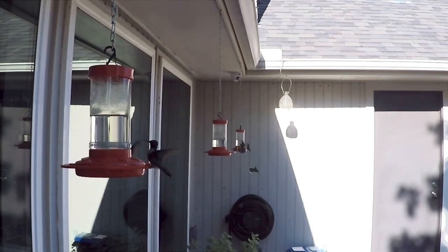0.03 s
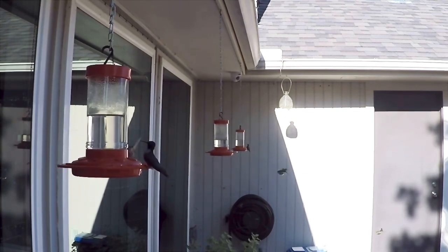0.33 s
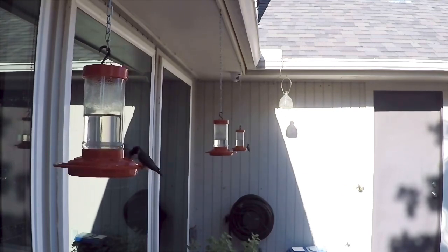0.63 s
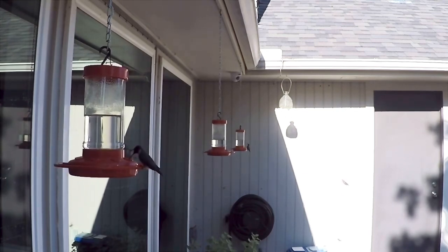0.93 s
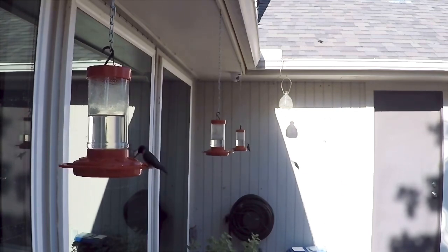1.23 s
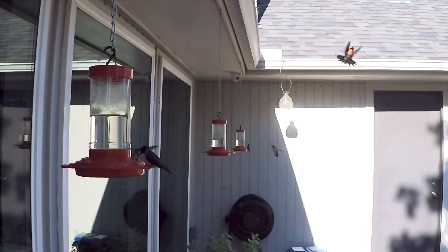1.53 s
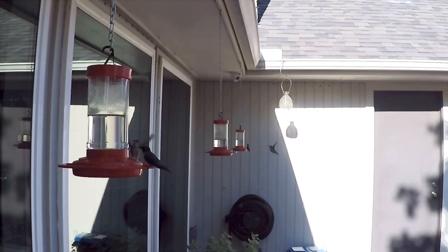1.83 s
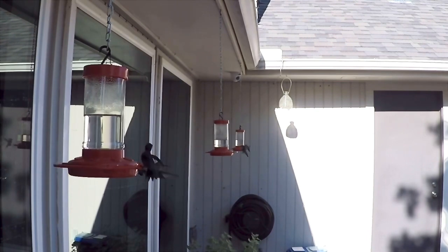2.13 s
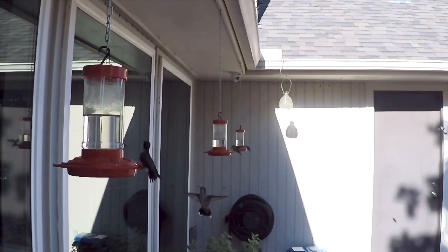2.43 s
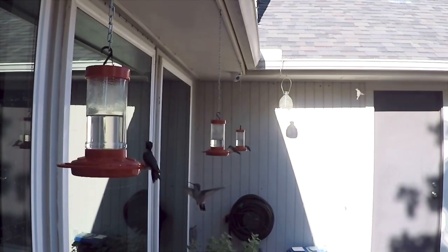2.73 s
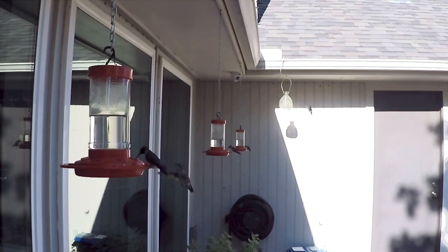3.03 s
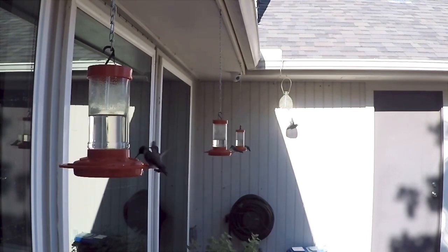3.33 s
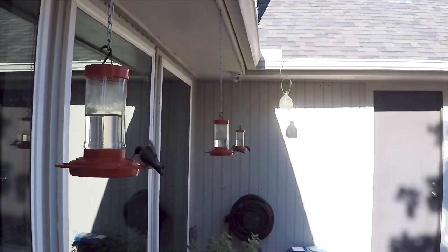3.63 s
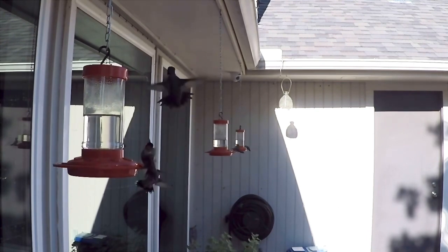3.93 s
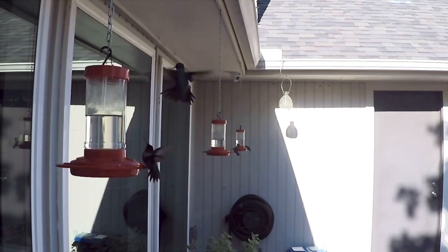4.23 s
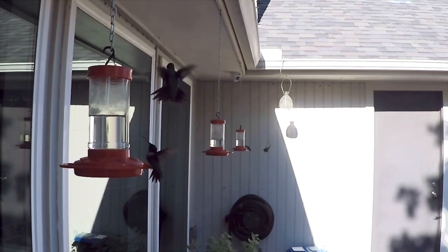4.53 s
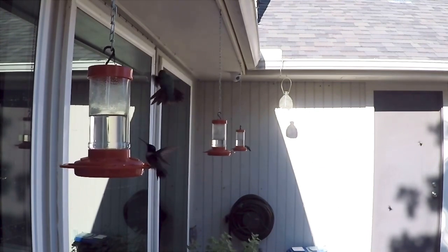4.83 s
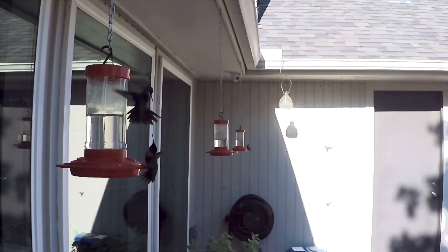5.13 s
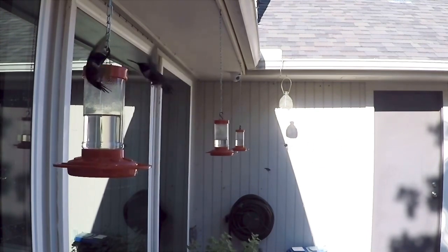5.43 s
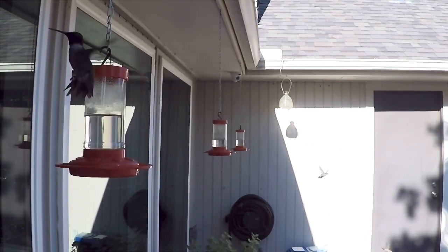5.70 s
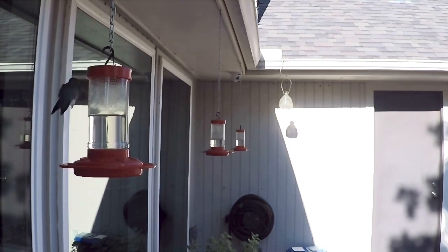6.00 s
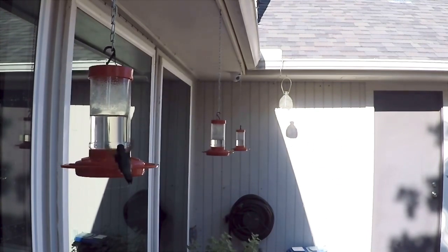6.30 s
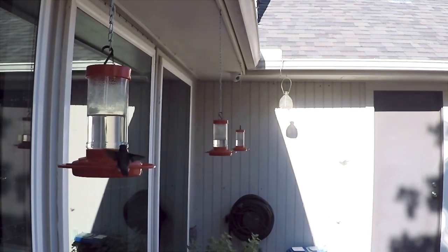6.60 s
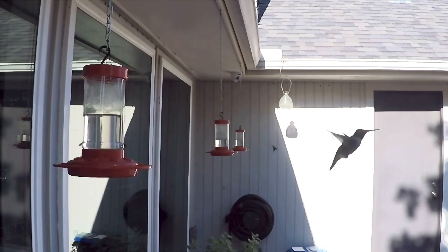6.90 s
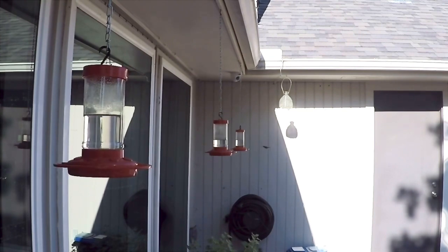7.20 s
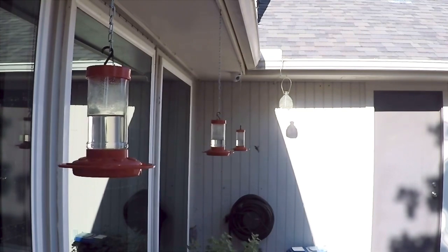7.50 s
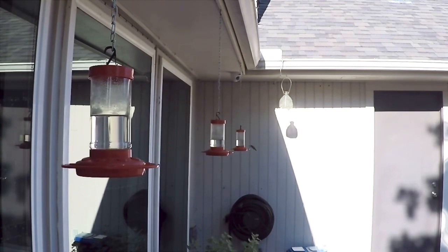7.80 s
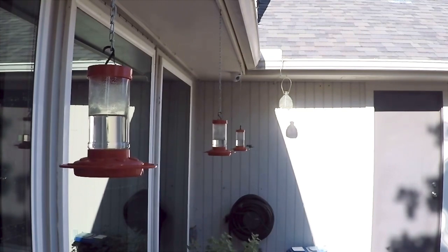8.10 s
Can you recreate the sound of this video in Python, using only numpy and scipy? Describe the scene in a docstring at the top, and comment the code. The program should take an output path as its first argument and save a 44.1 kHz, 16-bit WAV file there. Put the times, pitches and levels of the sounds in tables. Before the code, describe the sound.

Hummingbirds squabble around a feeder on a porch, trading quick runs of sharp chips, harsh rasps, buzzy trills and a few thin squeaks. Their wings hum in swells as they dart about, twice passing right by the microphone. Farther off, a larger bird repeats a nasal cry. The calls echo lightly off the house walls and thin out near the end, over a steady low outdoor rumble.

```python
"""On a porch, hummingbirds squabble round a feeder: falling chips, harsh rasps, buzzy trills and thin
squeaks. Each call is a tone of the syrinx; the throat's resonances colour all but the squeaks.
Wing strokes push the air periodically and hum, twice right past the microphone. Farther off a larger
bird repeats a nasal cry. The house walls reflect the calls, over a steady low outdoor rumble."""
import sys
import numpy as np
from scipy import signal
from scipy.fft import rfft, irfft, next_fast_len
from scipy.io import wavfile
from scipy.ndimage import map_coordinates

SR = 44100
rng = np.random.default_rng(int(sys.argv[2]) if len(sys.argv) > 2 else 0)


def store_wav(level_fs):
    """Save 16-bit WAV to argv[1]."""
    pcm = np.round(np.clip(np.atleast_2d(level_fs), -1, 1) * 32767)
    wavfile.write(sys.argv[1], SR, pcm.T.astype(np.int16))


N = 359415


def amp(db):
    """Decibels to amplitude ratio."""
    return 10 ** (np.asarray(db) / 20)


def unit(x):
    """Normalise to rms 1."""
    return x / np.sqrt(np.mean(x ** 2) + 1e-20)


def times(length_s):
    """Time axis of a note, in seconds."""
    return np.arange(int(length_s * SR)) / SR


def along(points, hz):
    """Interpolate (frequency_hz, value) points on a log frequency axis."""
    freqs, values = np.transpose(points)
    return np.interp(np.log(np.abs(hz) + 1), np.log(freqs + 1), values)


def timeline(points):
    """Interpolate (time_s, value) points over the whole scene."""
    return np.interp(np.arange(N) / SR, *np.transpose(points))


def wobble(rate, size):
    """Smooth random modulation with rate knots a second."""
    knots = rng.standard_normal(int(size * rate / SR) + 4)
    return map_coordinates(knots, [np.arange(size) * rate / SR])


def phase_of(hz):
    """Phase is the time integral of frequency."""
    return 2 * np.pi * np.cumsum(hz) / SR


def gate(t, length, rise, fall):
    """Envelope with sine-squared attack and release."""
    attack = np.sin(np.pi / 2 * np.clip(t / rise, 0, 1)) ** 2
    return attack * np.sin(np.pi / 2 * np.clip((length - t) / fall, 0, 1)) ** 2


def add(track, start_s, sound):
    """Superpose a sound on the track."""
    part = track[max(round(start_s * SR), 0):][:len(sound)]
    part += sound[:len(part)]


def filtered(x, response):
    """Linear filter: the spectrum times a frequency response."""
    size = next_fast_len(N + SR // 4)
    return irfft(rfft(x, size) * response(np.fft.rfftfreq(size, 1 / SR)), size)[..., :N]


# Left-right likeness of the outdoor noise: frequency_hz, correlation
COHERENCE = [(130, 0.99), (290, 1), (630, 0.12), (1380, -0.86), (3000, 0.45), (6600, 0.035)]
def noise_field(spectrum):
    """Partial coherence: the ratio of mid to side noise sets how alike the two channels are."""
    def response(hz):
        angle = np.arccos(np.clip(along(COHERENCE, hz), -1, 1)) / 2
        return amp(along(spectrum, hz)) * [np.cos(angle), np.sin(angle)]
    mid, side = filtered(rng.standard_normal((2, N)), response)
    return unit(np.array([mid + side, mid - side]))


# Spectra of the rumble and the hiss: frequency_hz, relative_density_db
RUMBLE_SPECTRUM = [(12, -48), (20, -21), (32, 0.5), (40, 0), (85, -1.5), (96, -0.5), (124, -3),
                   (181, -12.5), (238, -13.5), (323, -20), (464, -20), (489, -20), (536, -23.5),
                   (619, -33.5), (1500, -46.5), (1950, -50.5), (3300, -120)]
HISS_SPECTRUM = [(710, -66), (1200, -5), (1700, -11.5), (2030, -14), (2880, -15.5), (4920, -19.5),
                 (9070, -17.5), (12700, -28), (14900, -41)]
# Course of the rumble: time_s, level_db
RUMBLE_LEVEL = [(0, -21), (6, -21), (8.15, -22.5)]
def outdoors(hiss_db=-54.5, drone_hz=527, drone_db=-46, drone_start_s=4.1):
    """Ambient noise floor: low rumble and faint hiss, with a distant tone that swells and fades once."""
    swell = gate(np.arange(N) / SR - drone_start_s, length=1.789, rise=0.16, fall=0.74)
    swell *= amp(drone_db + 3 * wobble(7, N))
    drone = swell * unit(np.sin(phase_of(drone_hz + 3 * wobble(8, N))))
    rumble = amp(timeline(RUMBLE_LEVEL)) * noise_field(RUMBLE_SPECTRUM)
    return rumble + amp(hiss_db) * noise_field(HISS_SPECTRUM) + drone


# Decay of the yard at stretch 1: frequency_hz, t60_s
YARD_DECAY = [(2000, 0.53), (7000, 0.28), (13000, 0.091)]
def porch(x, scatter_db, tail_db, stretch=1, scatter_t60_s=0.055):
    """Reverberation: early scatter from the eaves, then the yard's tail; both change as birds move."""
    hop = SR // 2
    window = signal.windows.hann(2 * hop, sym=False)
    padded, wet = np.pad(x, (hop, 2 * hop)), np.zeros((2, N + 3 * SR))
    for i in range(0, N + hop, hop):  # a fresh impulse response every half second
        block = padded[i:i + 2 * hop]
        if not block.any():
            continue
        hz, t, noise = signal.stft(rng.standard_normal((2, SR // 3)), SR, nperseg=256)
        t60_s = stretch * along(YARD_DECAY, hz)[:, None]
        tail = signal.istft(noise * amp(-60 * t / t60_s), SR, nperseg=256)[1]
        t = np.arange(tail.shape[1]) / SR
        scatter = rng.standard_normal(tail.shape) * (t > .002) * amp(-60 * t / scatter_t60_s)
        response = sum(amp(db) * part / np.linalg.norm(part, axis=1, keepdims=True)
                       for db, part in [(scatter_db, scatter), (tail_db, tail * (t > .008))])
        reflected = signal.fftconvolve((block * window)[None], response, axes=1)
        wet[:, i:i + reflected.shape[1]] += reflected
    return x + wet[:, hop:hop + N]


# Harmonics of the cry, from the fundamental up: relative_db
CRY_HARMONICS = [-41, -11, -2.5, 3, -1.5, -4.5, -3.5, -3, -4, -6.5, -9, -34]
# Cries of the larger bird: start_s, length_s, relative_db, pitch_hz, sag_hz, other_harmonics_db,
# roughness_ratio, break_after_s, broken_for_s, scoop_fraction, treble_db
NASAL_CRIES = [(0.632, .35, -47, 709, 64, -8, 0.33, 0.13, 0.18, -0.11, -0.5),
               (2.108, .4, -38, 800.7, 114.5, -15.5, 0.07, 0.19, .28, 0.19, 2.5),
               (4.488, 0.35, -46.5, 698, 13, -9, 0.31, 0.059, 0.18, -0.044, 1),
               (5.749, .34, -49.5, 703, 56, -4.5, 0.42, 0.123, 0.166, 0.12, 0.5),
               (7.077, 0.19, -64, 827, 6, -14, 0.16, 0.006, .01, 0.12, -6),
               (7.429, .14, -63, 799, 1, -16, 0, .053, 0, -0.01, -9),
               (8.076, .13, -49.5, 782, -42, 1.5, 0.05, 0.094, 0, 0.12, -4.5)]
def nasal_cries(scoop_s=.021, break_db=-10.5, odd_db=-6, hoarse_from=0.38, jitter=.046, shimmer_db=6):
    """Jitter and shimmer: as the voice breaks it turns hoarse and its dominant fourth harmonic weakens."""
    out = np.zeros(N)
    dominant = np.argmax(CRY_HARMONICS) + 1
    for (start, length, db, hz, sag_hz, others_db,
         base_rough, break_s, broken_s, scoop, treble_db) in NASAL_CRIES:
        t = times(length)
        broken = gate(t - break_s, broken_s, rise=0.051, fall=0.051)
        rough = base_rough + 0.24 * broken
        clear = np.clip(1 - rough / hoarse_from, 0, 1)  # a clear voice has weak odd harmonics
        pitch = hz - sag_hz * np.sin(np.pi / 2 * (t / length) ** .85) ** 2
        pitch *= 1 - scoop * np.exp(-t / scoop_s)  # slides onto the note
        pitch *= 1 + 0.00292 * wobble(31, len(t)) + jitter * rough * wobble(600, len(t))
        phase = phase_of(pitch)
        call = np.zeros(len(t))
        for k, level in enumerate(CRY_HARMONICS, 1):
            level += treble_db * (k > dominant + 2)
            level += break_db * broken if k == dominant else others_db + odd_db * (k % 2) * clear
            call += amp(level + shimmer_db * rough * wobble(214.6, len(t))) * np.sin(k * phase)
        envelope = amp(db + 1.6 * wobble(29.4, len(t))) * gate(t, length, rise=0.048, fall=0.037)
        hoarseness = 1 + amp(-11) * rough * wobble(1400, len(t))
        add(out, start, envelope * call * hoarseness)
    return out


# Close passes of the birds: nearest_s, level_db, half_width_s, odd_over_even_db
FLYBYS = [(.6, -28.5, 0.11, -0.5), (1.35, -27, 0.19, -1.5), (1.68, -22, 0.16, 2), (1.95, -23, .08, -1),
          (2.3, -25.5, 0.26, 0), (2.75, -27, 0.13, -8), (3.48, -16.5, 0.035, 8), (3.601, -12, 0.085, 0),
          (3.72, -17.5, 0.098, 6.5), (3.9, -22.5, 0.13, 2), (4.47, -26.5, 0.13, -3),
          (4.88, -26.5, 0.048, -7), (5.22, -20.5, 0.089, 0.5), (5.42, -21.5, 0.15, -4.5),
          (5.628, -12, 0.097, -1), (5.95, -25.5, 0.082, -10.5), (6.18, -20.5, 0.15, -3),
          (6.7, -25.5, 0.097, -3.5)]
def flybys():
    """Near field: each hum falls with distance squared. Powers add; the loudest bird sets the colour."""
    nearest_s, db, width_s, odd_db = np.transpose(FLYBYS)[:, :, None]
    distance_squared = 1 + ((np.arange(N) / SR - nearest_s) / width_s) ** 2
    power = (amp(db) / distance_squared) ** 2
    return (power * odd_db).sum(0) / power.sum(0), np.sqrt(power.sum(0))


# The wingbeat slows as a bird brakes and quickens as it darts off: time_s, rate_hz
BEAT_RATE = [(1.7, 59), (1.95, 64), (2.3, 59.4), (2.95, 56.7), (3.5, 54), (3.555, 49.5), (3.61, 51.7),
             (3.66, 63.3), (4.42, 51.7), (4.9, 57.5), (5.38, 61.8), (5.65, 51.4), (5.92, 54.6),
             (6.15, 54.5)]
# Harmonics of the wingbeat, from the fundamental up: relative_db
WING_HARMONICS = [-1, 1, -13.5, -8, -13, -19.5, -22, -26.5, -30, -41]
# Turbulence shed by the wings: frequency_hz, relative_density_db
WHIRR_SPECTRUM = [(15, -40), (45, -15), (130, -4.5), (300, -7.5), (480, -13.5), (700, -37), (3000, -120)]
def wings(flicker_db=2, wander_rad=.12, whirr_db=-15):
    """Periodic loading: both strokes push air, favouring the second harmonic; each beat sheds a puff."""
    odd_db, gain = flybys()
    phase = phase_of(timeline(BEAT_RATE) * (1 + .006 * wobble(25, N)))
    hum = np.zeros(N)
    for k, level in enumerate(WING_HARMONICS, 1):
        strength = amp(level + odd_db * (k % 2 - .5) + flicker_db * wobble(9, N))
        hum += strength * np.sin(k * phase + rng.uniform(0, 2 * np.pi) + wander_rad * wobble(28, N))
    puffs = rng.standard_normal(N) * (1 + np.cos(phase))
    whirr = filtered(puffs, lambda hz: amp(along(WHIRR_SPECTRUM, hz)))
    return gain * (unit(hum) + amp(whirr_db) * unit(whirr))


# Thin whistles: start_s, length_s, level_db, pitch_hz, dip_fraction, sag_fraction
SQUEAK_NOTES = [(1.483, 0.069, -28, 7060, 0.027, -0.023), (4.195, 0.11, -52, 4615, 0.027, 0.052),
                (5.392, 0.0922, -38.5, 6920, 0.01804, 0.0086), (5.696, 0.11, -26, 6840, 0.1, 0.023)]
def squeaks(octave_db=-28, waver=0.0075, dip_at=0.19, dip_width=0.2):
    """Nearly sinusoidal oscillation: the pitch dips, recovers, then sags or lifts as the note fades."""
    out = np.zeros(N)
    for start, length, db, hz, dip, sag in SQUEAK_NOTES:
        t = times(length)
        progress = t / length
        pitch = hz * (1 - dip * np.exp(-((progress - dip_at) / dip_width) ** 2) - sag * progress ** 2)
        phase = phase_of(pitch * (1 + waver * wobble(299, len(t))))
        envelope = gate(t, length, rise=0.012, fall=0.047) * amp(db + 0.5 * progress ** 2)
        add(out, start, envelope * np.sqrt(2) * (np.sin(phase) + amp(octave_db) * np.sin(2 * phase)))
    return out


def voice(pitch, throat, low_db, slope_db=0, count=7):
    """Source and filter: syrinx harmonics sweep through the fixed resonances of the throat."""
    k = np.arange(1, count + 1)[:, None]
    hz = k * pitch
    low_weight = along([(4600, 0.82), (6400, 0.077)], hz)  # mainly partials under about 5 kHz
    db = along(throat, hz) + low_db * low_weight + slope_db * (k - 1)
    phase = phase_of(pitch) + rng.uniform(0, 2 * np.pi)
    return unit((amp(db) * (hz < SR / 2) * np.sin(k * phase)).sum(0))


# Throat response in a trill: frequency_hz, gain_db
TRILL_FORMANTS = [(2000, 3.5), (3200, -3), (5000, -4), (6500, 3.5), (7600, 0.5), (9300, 2.5), (10400, -3.5),
                  (12000, -18.5), (15000, -26)]
# Buzzy trills: start_s, length_s, note_rate_hz, relative_db, top_pitch_hz, whip_db
TRILL_RUNS = [(1.588, .078, 66, -44.5, 6820, 1), (2.418, 0.1, 80.5, -39, 6633, -4.5),
              (3.833, 0.13, 84, -40, 6280, 1.5), (4.343, 0.12, 78.3, -41.5, 6050, 7),
              (5.835, 0.11, 73, -49, 6760, -2)]
def trills(whip_depth=0.59, whip_s=0.0031, droop=0.055, jitter=0.11, edge_db=-13):
    """A pulse train heard as a buzz swells and fades; each note whips up over an octave, then droops."""
    out = np.zeros(N)
    for start, length, rate, db, hz, whip_db in TRILL_RUNS:
        t = times(1 / rate)
        progress, count = t * rate, round(length * rate)
        for k in range(count):
            whip = np.exp(-(t / (whip_s * np.exp(.15 * rng.normal()))) ** 3)
            arch = 1 - whip_depth * whip - droop * (2 * progress - 1) ** 2 * (progress > .5)
            pitch = hz * (arch + jitter * whip * wobble(1800, len(t)) + 0.0064 * rng.normal())
            accent_db = whip_db * np.exp(-((progress - .2) / .2) ** 2) + 3.2 * wobble(1400, len(t))
            envelope = unit(gate(progress, length=.88, rise=.17, fall=.4) * amp(accent_db))
            level = db + 5.5 + edge_db * (2 * (k + .5) / count - 1) ** 2 + 1.8 * rng.normal()
            onset = start + k / rate + 0.00033 * rng.normal()
            tone = voice(pitch, TRILL_FORMANTS, low_db=0, slope_db=0.5, count=4)
            add(out, onset, amp(level) * envelope * tone)
    return out


# Throat response in rasps and chips: frequency_hz, gain_db
CHIP_FORMANTS = [(1500, 6.5), (2200, 4.5), (3200, 4), (4500, -1), (5600, 6), (6500, 1.5), (7400, 14.5),
                 (8300, -2), (9300, -0.5), (10500, -4), (12000, -19), (15000, -18)]
# Harsh rasps: start_s, length_s, level_db, low_partials_db, pitch_hz
RASP_NOTES = [(1.686, 0.062, -42.5, -13.5, 2660), (2.569, 0.034, -33, -20.5, 2516),
              (3.73, 0.057, -49, -0.5, 2440), (4.011, 0.061, -34.5, -14, 2447),
              (4.551, 0.048, -35, -12, 2420), (4.925, 0.019, -42, -5.5, 2370),
              (5.158, 0.031, -53.5, -2, 2400), (5.212, 0.023, -49, -0.5, 2410),
              (5.395, 0.0082, -44.5, -14.5, 2540), (5.461, 0.071, -47.5, -13.5, 2307),
              (5.603, 0.075, -48.5, -17.5, 2528), (5.97, 0.045, -34.5, -20, 2467)]
def rasps(flutter_hz=240, depth=0.23, jitter=0.1125):
    """Modulation sidebands: a fast, uneven flutter shakes the pitch and level of a held chip voice."""
    out = np.zeros(N)
    for start, length, db, low_db, hz in RASP_NOTES:
        t = times(length)
        flutter = np.sin(phase_of(flutter_hz * (1 + 0.172 * wobble(99.8, len(t)))))
        pitch = hz * (1 - 0.027 * t / length + depth * flutter + jitter * wobble(1560, len(t)))
        shimmer = amp(2 * flutter + 2.5 * wobble(600, len(t)))
        envelope = unit(gate(t, length, rise=0.12 * length, fall=0.014) * shimmer)
        add(out, start, amp(db) * envelope * voice(pitch, CHIP_FORMANTS, low_db + 7))
    return out


# Runs of chips: first_s, last_s, count, slowing_fraction, relative_db, step_db, low_partials_db,
# pitch_hz, step_hz, echo_db
CHIP_RUNS = [(0.906, 0.988, 2, 0, -56.5, 1.5, -3, 2000, 2, -12),
             (1.287, 1.383, 2, 0, -51, -9, -5, 2010, -200, -9),
             (1.683, 1.771, 2, 0, -34, -2, -11.5, 1935, 33, -16),
             (1.785, 2.035, 6, 0.07, -45.5, -0.5, -8.5, 2980, -58.5, -6),
             (2.182, 2.267, 2, 0, -50.5, 2.5, -2, 1960, -27, -6),
             (2.242, 2.325, 2, 0, -41.5, 3, -18, 2026, 85, -9),
             (2.645, 2.821, 4, 0.2, -34, -.5, -14, 2455, 10.5, -17),
             (3.034, 3.129, 2, 0, -52, -1, 5, 2400, -180, -16),
             (3.244, 3.443, 3, 0, -37, 1.6, -10.5, 1945, 21, -11.5),
             (3.664, 3.664, 1, 0.1, -48, 4, 0.5, 2400, 0, -11),
             (4.125, 4.241, 3, .07, -35, -1, -11, 2447, -23, -11),
             (4.682, 4.682, 1, 0, -37.5, 0, -8, 2420, 3, -8),
             (6.075, 6.294, 5, 0.21, -37.5, -0.5, -9.5, 2700, -47, -10),
             (7.167, 7.317, 2, 0.2, -57, 1, -8, 2170, -290, -3),
             (7.59, 7.73, 2, 0.0031, -61.5, 1, 5, 2410, -430, -5)]
def chips(length_s=0.018, bend=0.3, hold=.9, hold_below_hz=2550, fray=.05, echo_s=0.007):
    """Steep downward frequency sweeps, each followed by its reflection from the glass door."""
    out = np.zeros(N)
    t = times(length_s)
    progress = t / length_s
    for first, last, count, slowing, first_db, step_db, low_db, first_hz, step_hz, echo_db in CHIP_RUNS:
        for k, place in enumerate(np.linspace(0, 1, round(count))):
            onset = first + (last - first) * place * (1 - slowing * (1 - place))
            db = first_db + k * step_db
            hz = (first_hz + k * step_hz) * (1 + 0.0086 * rng.normal())
            force = np.interp(db, [-50, -35], [.15, 1])
            fall = 0.24 + 0.000131 * (hz - 1960)  # higher chips lose a larger share of their pitch
            # A low, forceful chip holds its pitch first; force also frays the end.
            curve = bend - hold * force * (first_hz < hold_below_hz)
            glide = fall * progress * (1 + curve * (1 - progress))
            jitter = (.011 + fray * force * progress ** 2) * wobble(1818, len(t))
            decay = amp(-7 * progress + 2.15 * wobble(450, len(t)))
            envelope = unit(gate(t, length_s, rise=0.0012, fall=0.0024) * decay)
            tone = voice(hz * (1 - glide + jitter), CHIP_FORMANTS, low_db + 4.5)
            chip = amp(db + 2.5) * envelope * tone * np.sqrt(1 + amp(low_db) ** 2)
            add(out, onset, chip)
            add(out, onset + echo_s * rng.uniform(0.8, 1.2), amp(echo_db) * chip)
    return out


def panned(x, ports):
    """Direction cues: level and phase differences between the two microphone ports."""
    freqs, level_db, lead_rad = np.transpose(ports)
    split = lambda values, hz: np.outer([.5, -.5], along(np.c_[freqs, values], hz))
    return filtered(x, lambda hz: amp(split(level_db, hz)) * np.exp(1j * split(lead_rad, hz)))


# Port differences for wings and background, larger bird and hummingbird calls:
# frequency_hz, left_minus_right_db, left_lead_rad
AMBIENT_PORTS = [(60, 0, 0.005), (107, 1.5, 0), (202, 1.5, 0.23), (393, 6, 0.0045), (617, 5.5, 0.092),
                 (1060, 0, 0.68), (7900, -1, 0)]
CRY_PORTS = [(2000, 0.78, 1), (4000, -1, -1.3), (7000, -1, -1.7)]
HUMMINGBIRD_PORTS = [(1900, 4.5, 0.99), (4150, -1, 0.52), (6770, 2.5, 1.5), (8280, 0, 2.2),
                     (8450, -10.5, 1.16), (11500, 0.5, 2.1)]
def scene():
    """Superposition: reverberant calls, near and far, add to the wings and the background."""
    sweeps = porch(chips(), scatter_db=-9, tail_db=-12)
    buzzes = porch(rasps() + trills(), scatter_db=-4.5, tail_db=-8.5)
    whistles = porch(squeaks(), scatter_db=-9, tail_db=-10)
    caller = porch(amp(2.5) * nasal_cries(), scatter_db=-9, tail_db=-9, stretch=1.8)
    squabble = panned(sweeps + buzzes + whistles, HUMMINGBIRD_PORTS)
    return panned(wings() + outdoors(), AMBIENT_PORTS) + panned(caller, CRY_PORTS) + squabble


def record(dry, low_cut_hz=34, top_hz=15100):
    """Band limiting: the deepest bass rolls off and nothing passes above top_hz."""
    return filtered(dry, lambda hz: (hz < top_hz) / np.sqrt(1 + (low_cut_hz / (hz + 1)) ** 6))


dry = scene()
out = record(dry)
store_wav(out)
```